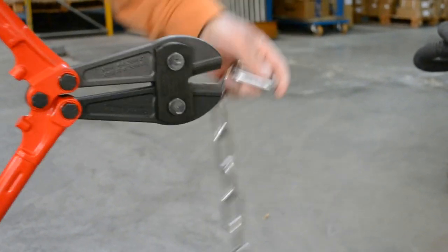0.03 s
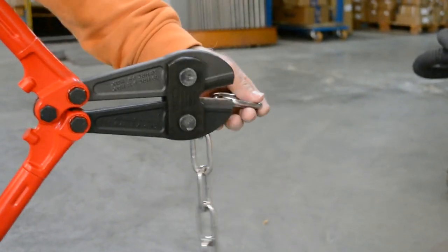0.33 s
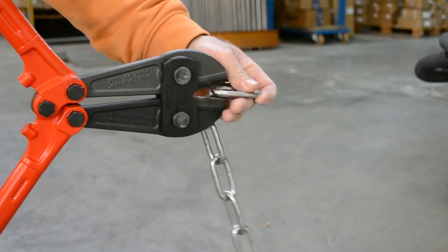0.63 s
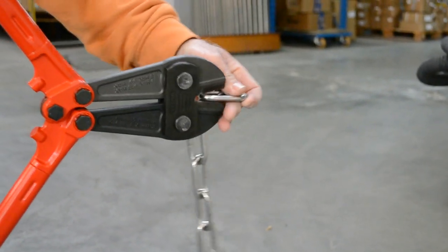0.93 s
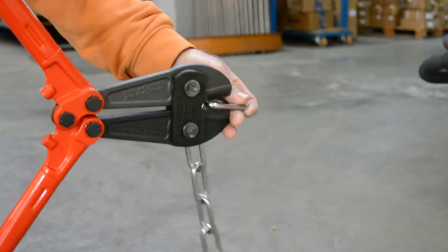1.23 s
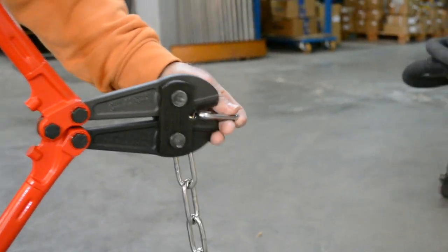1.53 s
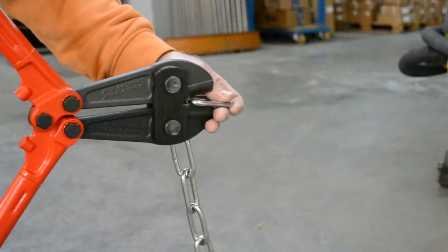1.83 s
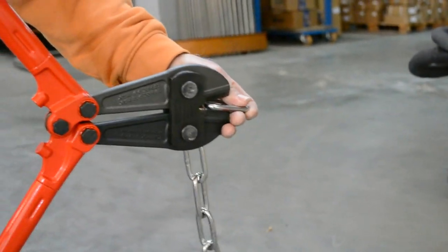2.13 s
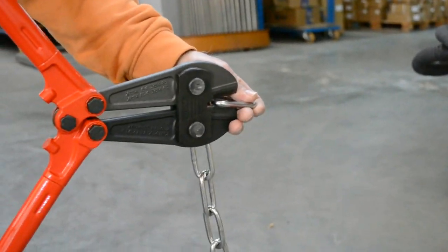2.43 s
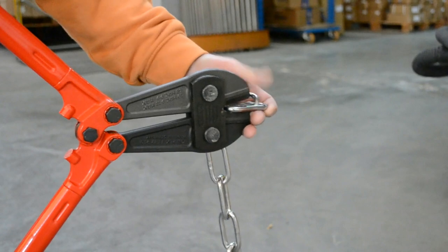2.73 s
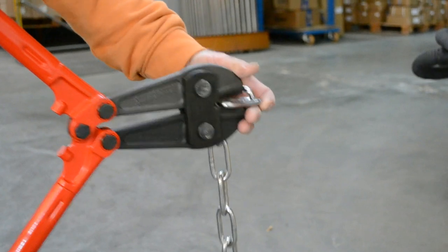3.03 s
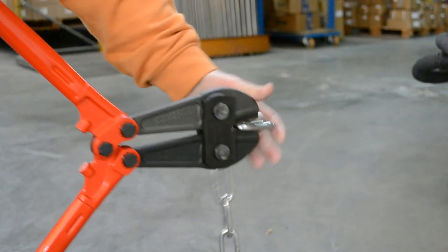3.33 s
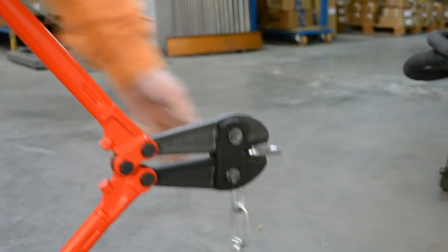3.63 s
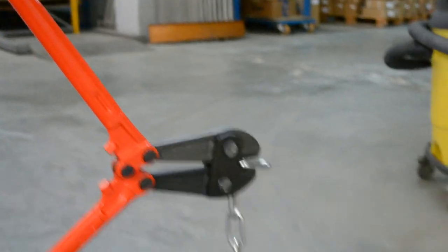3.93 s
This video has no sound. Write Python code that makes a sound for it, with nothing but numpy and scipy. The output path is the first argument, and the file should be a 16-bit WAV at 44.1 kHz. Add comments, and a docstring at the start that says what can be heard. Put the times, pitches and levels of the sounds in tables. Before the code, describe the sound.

Close, bright chain rattling with metallic knocks and dull thuds as a link goes into bolt cutters. Something clatters far off in the hall. After a lull of small ticks, the chain swings loose and jingles loudly.

```python
"""A warehouse-like workshop, where a steel chain is fed into the jaws of large bolt cutters.
The links rattle and ring near 7 kHz, knock on the jaws and thud through the frame; something
clatters far off in the hall. The link slides and the jaws tick as it is seated, then the hand
lets go and the hanging chain jingles freely. Room tone and a distant din sit underneath."""
import sys
import numpy as np
from scipy import signal
from scipy.fft import rfft, irfft
from scipy.io import wavfile
from scipy.ndimage import uniform_filter1d

SR = 44100
rng = np.random.default_rng(int(sys.argv[2]) if len(sys.argv) > 2 else 0)


def unload_wav(signal):
    """Save mono or channel-first audio to the path in sys.argv[1] as 16-bit WAV at rate SR, clipped to [-1, 1]."""
    wavfile.write(
        sys.argv[1],
        SR,
        np.round(np.clip(np.atleast_2d(signal).T, -1, 1) * 32767).astype(np.int16),
    )


N = 176400
TIME = np.arange(N) / SR
HIT_TIME = TIME[:SR // 2]

# EQ curves for the noise layers. Each row: frequency in Hz, gain in dB.
ROOM_TONE_EQ = [(25, -20.5), (60, -7), (120, -5.5), (350, -1), (1000, -1), (1800, -5), (4000, -16),
                (8000, -23), (11000, -32)]
DIN_EQ = [(150, -26), (400, -6), (700, -3), (1000, 2), (1500, 2), (2100, 2.5), (3000, -6), (5000, -17.5),
          (10000, -43.5)]
HALL_EQ = [(100, -17.5), (400, -20), (700, -20.5), (1100, -8.5), (2200, -20.5), (4000, -15.5),
           (7000, -25.5), (11000, -12.5)]
CLATTER_EQ = [(150, -28), (450, -22.5), (600, 7.5), (740, 7.5), (950, 1), (2000, 3.5), (2700, -1.5),
              (3600, -0.5), (5000, -10), (7500, -12), (10000, -22)]
SLIDE_EQ = [(300, -23.5), (1800, 5), (3500, 3), (6000, 4), (8000, 5), (9700, 6), (11500, -12.5)]
TICK_EQ = [(100, -28.5), (300, -8.5), (900, -9), (1800, -1), (3000, -11.5), (4500, -5), (6000, -1.5),
           (7500, 12.5), (8700, 5.5), (10000, 0.5), (11500, -24.5)]  # link touching link in the rattle
CLINK_EQ = [(200, -20.5), (1000, -2), (2500, 3), (4000, 2.5), (6000, 4.5), (8700, 7.5), (10000, -5.5),
            (11500, -7.5)]  # attack of a single clink
# The hall's decay. Each row: frequency in Hz, t60 in seconds.
HALL_T60 = [(100, 4), (1000, 1.4), (2500, 1), (4500, 0.41), (7000, .75), (11000, 0.26)]
# Fader rides for the din, the slide and the shaking chain. Each row: time in seconds, level in dB.
DIN_RIDE = [(0, -55.5), (.12, -40), (.3, -38), (.55, -48.5), (.72, -44), (.9, -46), (1.1, -54.5),
            (1.3, -56), (1.6, -60.5), (2.1, -87)]
SLIDE_RIDE = [(2.45, -99), (2.57, -69), (2.75, -82.5), (2.88, -69), (2.98, -65.5), (3.04, -65.5),
              (3.10, -49.5), (3.16, -52), (3.21, -88), (3.3, -83), (3.34, -55), (3.36, -54)]
HELD_RIDE = [(0, -24.5), (.02, -30.5), (.05, -38.5), (.10, -44), (.12, -29), (.15, -48.5), (.175, -22.5),
             (.225, -38), (.27, -28), (.32, -37.5), (.38, -30.5), (.44, -36), (.52, -30), (.56, -36),
             (.65, -41.5), (.72, -58.5), (.775, -42), (.81, -50), (.868, -53.5), (.898, -32), (.93, -41),
             (.95, -54.5), (1.05, -62)]
SETTLING_RIDE = [(1.37, -86), (1.425, -55.5), (1.5, -65), (1.62, -64), (1.72, -86), (1.9, -83), (2.2, -93)]
FREE_RIDE = [(3.32, -112), (3.35, -65), (3.388, -35), (3.398, -29.5), (3.415, -22.5), (3.44, -36),
             (3.48, -44.5), (3.535, -74), (3.55, -60), (3.585, -50), (3.6, -38), (3.64, -42),
             (3.664, -29.5), (3.68, -26), (3.685, -16.5), (3.705, -21.5), (3.755, -26), (3.795, -19),
             (3.817, -34.5), (3.824, -23), (3.855, -24.5), (3.895, -27.5), (3.91, -18), (3.925, -19),
             (3.94, -17.5), (3.957, -17), (3.98, -24.5), (4.0, -23.5)]
# Resonances of the steel parts. Each row: frequency in Hz, relative level in dB.
FRAME_MODES = [(285, -9.5), (327, -9.5), (378, -10), (488, -6), (622, -4.5), (678, -0.5), (775, -4.5),
               (872, -6.5), (1138, 0)]
JAW_MODES = [(915, 1.5), (985, -2.5), (1120, -3.5), (1567, 3), (1900, 3.5), (2143, -1), (2330, -7),
             (2471, 1), (2720, -3), (2930, -7), (3090, -1.5), (3580, -13), (4100, -10.5), (4860, -9.5)]
LINK_MODES = [(6705, -20), (6772, -4), (6800, -21.5), (6915, -19), (7030, 5.5), (7048, 1), (7075, -6.5),
              (7188, -11), (7285, -3), (7334, -8), (7430, -9), (7530, -39), (7970, -33), (8060, -28.5)]
# Cues for far bumps and for a lightly brushed link. Each row: start in seconds, level in dB.
FAR_BUMPS = [(.99, -36), (1.019, -37), (1.085, -44.5)]
LINK_BRUSHES = [(1.845, -66), (2.62, -63.5), (2.78, -79)]
# Heavy bumps on the frame. Each row: start in seconds, level in dB, low and high band edge in Hz.
FRAME_THUDS = [(.077, -31.5, 456, 1017), (.160, -33.5, 135, 788), (0.195, -47.5, 215, 417),
               (.239, -24.5, 352, 820), (.590, -46.5, 245, 624), (0.743, -25.5, 345, 912),
               (0.944, -48.5, 315, 520)]
# Steel on the jaws. Each row: start in seconds, level in dB, low and high band edge in Hz,
# contact time in seconds, ping pitch in Hz, ping level in dB against the rest of the knock.
JAW_KNOCKS = [(.077, -25, 614, 2220, 0.00097, 894, 0.5), (0.155, -23, 740, 3180, 0.0026, 1934, -2.5),
              (.162, -23, 617, 2270, 0.0019, 1266, -11), (.238, -31.5, 802, 2270, 0.002, 1600, -23),
              (0.448, -30, 1684, 3660, 0.00059, 4110, -15), (0.588, -32.5, 648, 2050, 0.0031, 1386, -6),
              (.624, -37, 2220, 4480, 0.0011, 2540, 5), (1.596, -38.5, 1780, 3100, 0.00069, 976, -7),
              (1.7723, -43.5, 2740, 7450, 0.00052, 3035, -3.5), (1.816, -43, 1870, 2960, .001, 980, -12),
              (2.558, -61, 1800, 5900, .008, 2100, -13), (2.598, -62, 1680, 4500, 0.003, 2050, -0.5),
              (2.617, -62.5, 1600, 3000, 0.0017, 2030, -6),
              (2.715, -53.5, 1790, 3300, 0.00062, 3330, -11.5),
              (2.788, -63.5, 1800, 3300, 0.0017, 2020, -8), (2.843, -47.5, 1500, 5950, .001, 4800, -2),
              (2.907, -64, 1600, 5000, 0.0031, 2050, 4), (3.101, -34.5, 2140, 5100, 0.00062, 3080, -8.5),
              (3.3561, -31.5, 1640, 3100, 0.00073, 1543, -1), (3.375, -42, 910, 3520, 0.0023, 1530, -14),
              (3.423, -36.5, 1900, 6200, 0.023, 3510, -6.5), (3.443, -40.5, 1400, 3660, 0.0041, 1465, -1),
              (3.594, -36.5, 1440, 4200, 0.0015, 1582, -8), (3.608, -34.5, 1380, 4150, 0.0014, 1500, -5.5),
              (3.628, -42.5, 1500, 3600, 0.0044, 1930, -3), (3.932, -33.5, 3020, 5300, 0.001, 4100, -11)]
# Single link accents. Each row: start in seconds, ring level in dB, contact level in dB.
LINK_CLINKS = [(.104, -29.5, -31), (.133, -31.5, -40.5), (.157, -31, -27.5), (0.235, -39, -52),
               (0.338, -66, -61), (0.365, -29.5, -44), (.379, -33, -37.5), (0.5, -31, -42),
               (0.515, -33, -44), (.576, -53, -46.5), (0.627, -51, -40.5), (0.742, -43, -51),
               (0.773, -43.5, -47), (0.825, -46.5, -58), (0.883, -42, -50), (0.923, -44, -62),
               (1.424, -58, -61.5), (1.596, -65, -47), (1.619, -60, -59), (1.7699, -79.5, -47.5),
               (2.039, -55.5, -64), (2.632, -62.5, -63), (2.843, -61.5, -55.5), (3.103, -45.5, -57),
               (3.3577, -33, -37), (3.394, -56, -38.5), (3.55, -51.5, -66), (3.592, -35.5, -41),
               (3.627, -34.5, -44.5), (3.684, -22, -36.5), (3.734, -42, -41), (3.823, -20, -39),
               (3.873, -29, -36.5), (3.905, -25, -37.5), (3.932, -17, -36.5), (3.956, -22, -47)]

LINK_BAND_HZ = (5600, 9600)
HELD_CONTRAST, SETTLING_CONTRAST, FREE_CONTRAST = 0.53, 0.4, 1.1  # multiply the link modes' dB


def from_db(db):
    """Decibels to gain."""
    return 10 ** (np.asarray(db) / 20)


def rms_one(x):
    """Scale to unit power."""
    return x / np.sqrt(np.mean(x ** 2) + 1e-20)


def unit_hit(x):
    """Scale a hit to unit power over its first 20 ms."""
    return x / np.sqrt(np.mean(x[:SR // 50] ** 2) + 1e-20)


def decay(t, t60):
    """Exponential fade, 60 dB down after t60 seconds."""
    return np.exp(-np.log(1000) * t / t60)


def attack(rise_s):
    """Linear fade-in for a hit."""
    return np.minimum(HIT_TIME / rise_s, 1)


def at_hz(curve, hz):
    """Read a curve on a log-frequency axis."""
    freqs, values = np.transpose(curve)
    return np.interp(np.log(hz + 1), np.log(freqs), values)


def fader(ride):
    """Gain over time, silent outside the ride."""
    return from_db(np.interp(TIME, *np.transpose(ride), left=-140, right=-140))


def eq(x, curve, size=4096):
    """Minimum-phase EQ: nothing rings ahead of an attack."""
    gains = from_db(at_hz(curve, np.arange(size // 2 + 1) * SR / size))
    cepstrum = irfft(np.log(gains))
    cepstrum[1:size // 2] *= 2
    cepstrum[size // 2 + 1:] = 0
    return signal.fftconvolve(x, irfft(np.exp(rfft(cepstrum))))[:len(x)]


def band(x, low_hz, high_hz):
    """Second-order band-pass."""
    return signal.sosfilt(signal.butter(2, [low_hz, high_hz], "band", fs=SR, output="sos"), x)


def add(out, start, sound):
    """Mix a sound in at its start in seconds."""
    i = int(start * SR)
    out[i:i + len(sound)] += sound[:N - i]


def crack(t60):
    """The dense, quickly dying modes of a contact: a noisy snap, then a short tail."""
    snap = from_db(-0.5) * decay(HIT_TIME, t60=0.0083)
    return rng.standard_normal(len(HIT_TIME)) * (decay(HIT_TIME, t60) + snap)


def struck(modes, t60, detune=0, spread_db=2.5):
    """One blow on a set of modes, each with a random strength and polarity."""
    ring = 0
    for hz, db in modes:
        strength, offset, polarity = rng.standard_normal(3)
        tone = np.sin(2 * np.pi * hz * (1 + detune * offset) * HIT_TIME)
        ring += np.sign(polarity) * from_db(db + spread_db * strength) * tone
    return unit_hit(ring * decay(HIT_TIME, t60))


def ringing(touches, modes, t60):
    """Resonators fed by a train of touches, each touch with a new strength for every mode."""
    ring, radius = 0, decay(1 / SR, t60)
    for hz, db in modes:
        angle = 2 * np.pi * hz / SR
        drive = touches * rng.standard_normal(N) + 1e-18
        feedback = [1, -2 * radius * np.cos(angle), radius ** 2]
        ring += from_db(db) * signal.lfilter([np.sin(angle)], feedback, drive)
    return rms_one(ring)


def blow(body, low_hz, high_hz, contact_s):
    """The place and hardness of a contact choose the band of the cutter that sounds."""
    return unit_hit(band(body * attack(contact_s), low_hz, high_hz))


def room_tone():
    """A steady, dark bed of air."""
    return from_db(-62) * rms_one(eq(rng.standard_normal(N), ROOM_TONE_EQ))


def far_din():
    """A diffuse midrange wash from the far end of the hall."""
    return fader(DIN_RIDE) * rms_one(eq(rng.standard_normal(N), DIN_EQ))


def hall_reverb(x, build_s=0.01):
    """A long diffuse tail that dies sooner in the treble."""
    t, tail = TIME[:2 * SR], 0
    edges_hz = np.geomspace(80, 13000, 12)
    for low, high in zip(edges_hz, edges_hz[1:]):
        centre_hz = np.sqrt(low * high)
        envelope = decay(t, at_hz(HALL_T60, centre_hz)) * (1 - np.exp(-t / build_s))
        wash = band(rng.standard_normal(len(t)), low, high)
        tail += from_db(at_hz(HALL_EQ, centre_hz)) * wash * envelope / np.linalg.norm(envelope)
    return signal.fftconvolve(x, tail)[:N]


def far_clatter():
    """Bumps blurred by distance into soft-edged bursts of noise."""
    out = np.zeros(N)
    for start, db in FAR_BUMPS:
        blur = eq(rng.standard_normal(len(HIT_TIME)), CLATTER_EQ) * decay(HIT_TIME, t60=0.6)
        add(out, start, from_db(db) * unit_hit(blur) * attack(rise_s=0.02))
    return out


def singing_link(pitch_hz=7800, width_hz=90):
    """A loose link, lightly brushed: its narrow resonance rings on, faint and wavering."""
    out = np.zeros(N)
    for start, db in LINK_BRUSHES:
        narrow_noise = band(rng.standard_normal(SR), pitch_hz - width_hz / 2, pitch_hz + width_hz / 2)
        tone = rms_one(narrow_noise[-len(HIT_TIME):])
        add(out, start, from_db(db) * tone * decay(HIT_TIME, t60=0.44) * attack(rise_s=0.021))
    return out


def sliding_link(grain_db=3):
    """Fine, grainy friction of the link in the jaws."""
    grain = from_db(grain_db * rms_one(uniform_filter1d(rng.standard_normal(N), size=80)))
    return fader(SLIDE_RIDE) * rms_one(eq(grain * rng.standard_normal(N), SLIDE_EQ))


def frame_thuds():
    """Heavy bumps shake the low modes of the cutter's frame."""
    out = np.zeros(N)
    for start, db, low_hz, high_hz in FRAME_THUDS:
        body = struck(FRAME_MODES, t60=0.12) + from_db(9.5) * unit_hit(crack(t60=0.027))
        add(out, start, from_db(db) * blow(body, low_hz, high_hz, contact_s=0.002))
    return out


def jaw_knocks():
    """Steel hits the jaws: a hard crack, a short ring and one ping on top."""
    out = np.zeros(N)
    for start, db, low_hz, high_hz, contact_s, ping_hz, ping_db in JAW_KNOCKS:
        centre_hz = np.sqrt(low_hz * high_hz)
        sustain = (centre_hz / 2000) ** -0.41  # higher knocks die sooner
        ring = struck(JAW_MODES, t60=0.071 * sustain)
        contact = from_db(11) * unit_hit(crack(t60=0.066 * sustain))
        knock = blow(ring + contact, low_hz, high_hz, contact_s)
        ping_envelope = attack(contact_s) * decay(HIT_TIME, t60=0.063 * sustain)
        ping = unit_hit(np.sin(2 * np.pi * ping_hz * HIT_TIME) * ping_envelope)
        add(out, start, from_db(db) * unit_hit(knock + from_db(ping_db) * ping))
    return out


def link_modes(contrast):
    """The links' resonances; more contrast lets the strongest stand out as pitches."""
    return [(hz, db * contrast) for hz, db in LINK_MODES]


def clinks():
    """Single link-on-link hits: a bright crack and a ring, purer once the chain hangs free."""
    out = np.zeros(N)
    release_s = FREE_RIDE[0][0]
    for start, ring_db, contact_db in LINK_CLINKS:
        modes = link_modes(FREE_CONTRAST if start > release_s else HELD_CONTRAST)
        ring = band(struck(modes, t60=0.19, detune=0.003), *LINK_BAND_HZ)
        contact = unit_hit(eq(crack(t60=0.1), CLINK_EQ))
        add(out, start, from_db(ring_db) * ring + from_db(contact_db) * contact)
    return out


def rattle(ride, contrast, ring_t60, contact_db, touches_per_s=330, spread_db=3):
    """Links touch at random; every touch ticks, feeds their ringing and shakes the cutter."""
    onsets = rng.random(N) < touches_per_s / SR
    touches = onsets * from_db(spread_db * np.minimum(rng.standard_normal(N), 2))
    ring = band(ringing(touches, link_modes(contrast), ring_t60), *LINK_BAND_HZ)
    ring_power = np.abs(uniform_filter1d(ring ** 2, size=600))
    ring /= np.sqrt(ring_power + 1e-6)  # flatten the ring so the ride shapes its dynamics
    tick_envelope = signal.lfilter([1], [1, -decay(1 / SR, t60=0.022)], touches + 1e-18)
    ticks = rms_one(eq(tick_envelope * rng.standard_normal(N), TICK_EQ))
    jaws = ringing(touches, JAW_MODES, t60=0.078)
    frame = ringing(touches, FRAME_MODES, t60=0.078)
    cutter = jaws + from_db(-13.5) * frame
    contact = ticks + from_db(-10) * cutter
    return fader(ride) * (ring + from_db(contact_db) * contact)


def chain():
    """A tight rattle in the hand, a faint settling, then an open jingle, with clinks as accents."""
    held = rattle(HELD_RIDE, HELD_CONTRAST, ring_t60=0.08, contact_db=-7.5)
    settling = rattle(SETTLING_RIDE, SETTLING_CONTRAST, ring_t60=0.076, contact_db=-16.5)
    free = rattle(FREE_RIDE, FREE_CONTRAST, ring_t60=0.18, contact_db=-16)
    return held + settling + free + clinks()


def scene():
    """Chain and cutter up front, the hall around them, in mono."""
    sources = chain() + singing_link() + jaw_knocks() + frame_thuds() + sliding_link() + far_clatter()
    bed = far_din() + room_tone()
    return (sources + hall_reverb(sources) + bed)[None]


def record(dry):
    """A steep high cut, 70 dB down from 12.6 kHz up."""
    return signal.sosfilt(signal.cheby2(12, 70, 12600, fs=SR, output="sos"), dry)


dry = scene()
out = record(dry)
unload_wav(out)
```